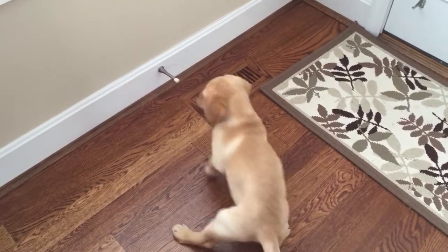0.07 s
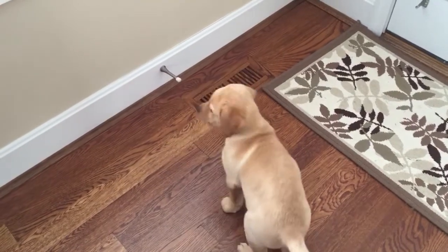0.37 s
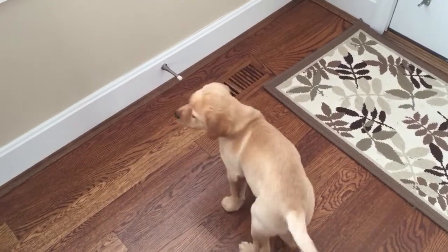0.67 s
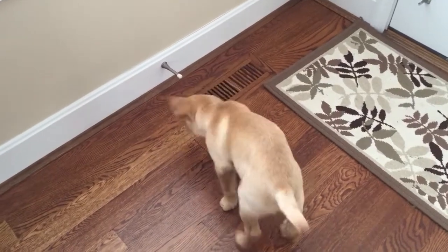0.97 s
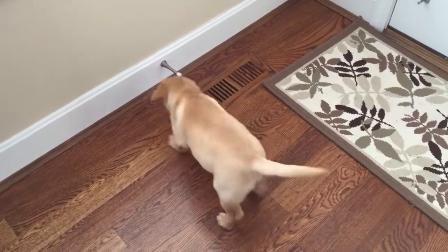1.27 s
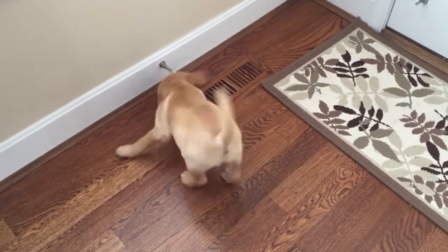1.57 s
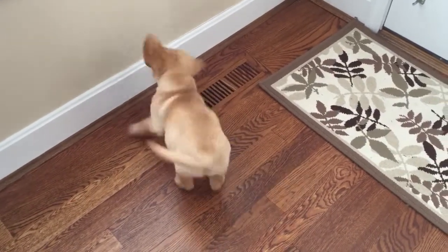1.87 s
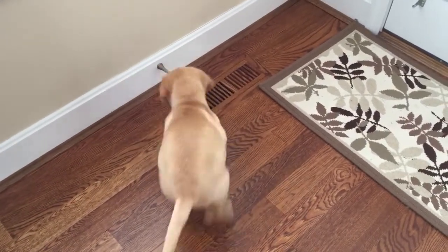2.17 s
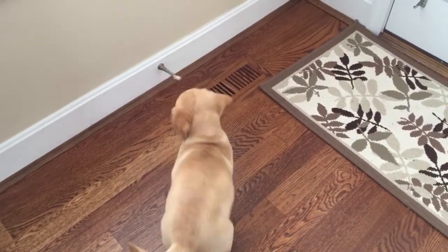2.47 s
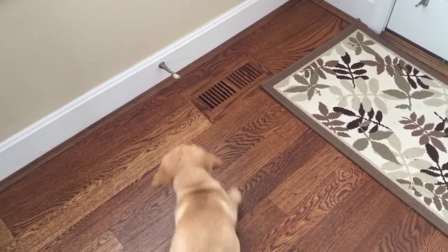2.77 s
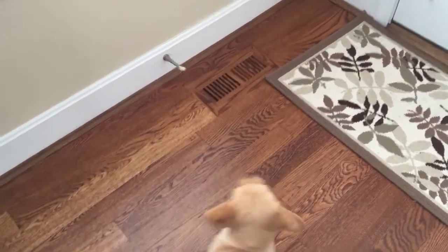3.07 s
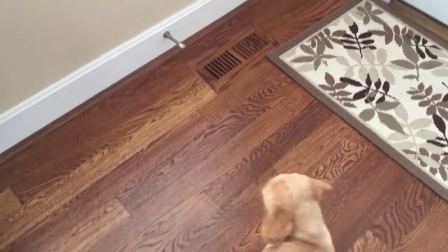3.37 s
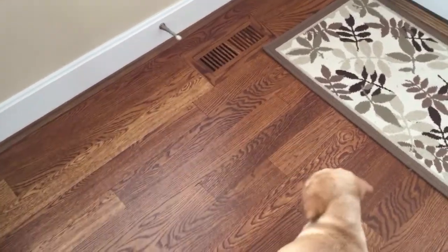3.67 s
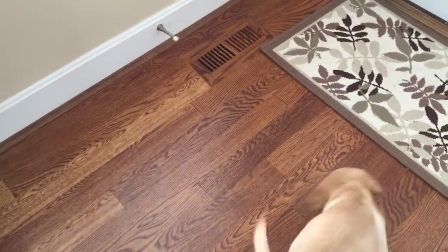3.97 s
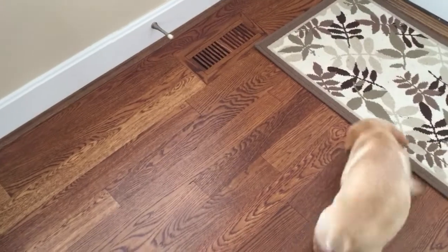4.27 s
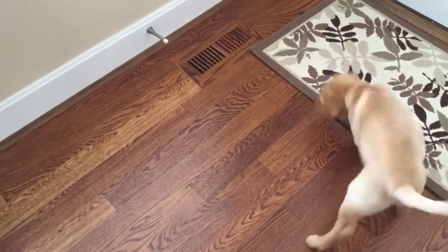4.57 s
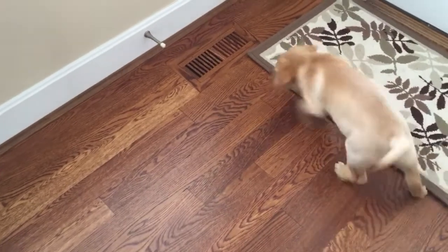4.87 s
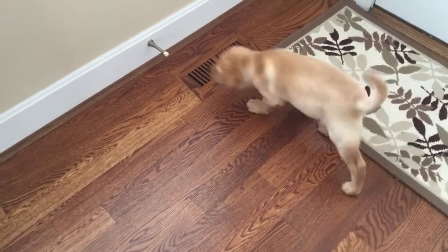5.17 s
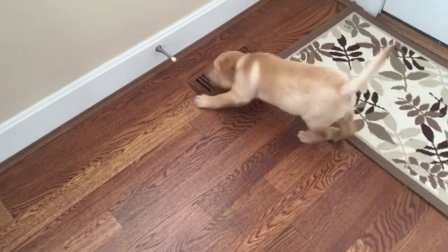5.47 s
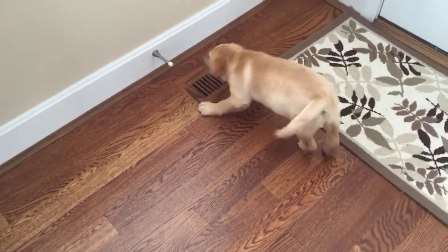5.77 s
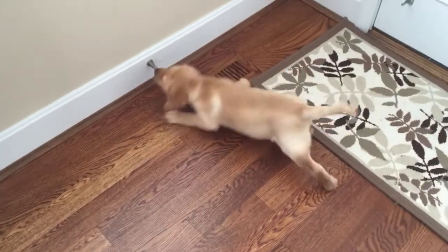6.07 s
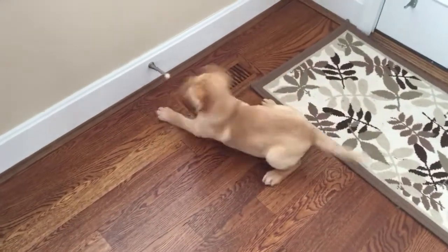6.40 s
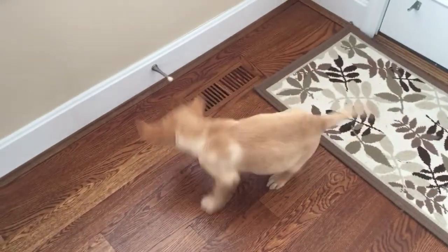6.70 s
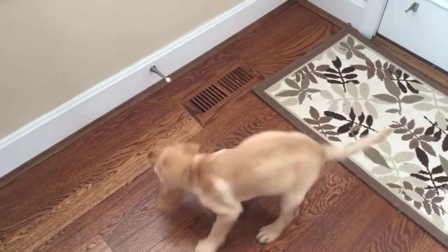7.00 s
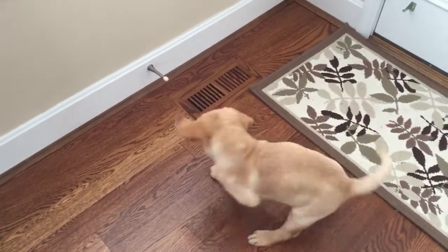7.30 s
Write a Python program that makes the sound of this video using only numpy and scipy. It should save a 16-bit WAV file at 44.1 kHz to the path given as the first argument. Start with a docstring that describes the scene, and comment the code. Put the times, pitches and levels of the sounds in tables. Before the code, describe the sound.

In an echoing hallway, six short, loud puppy barks crackle on a nearby phone microphone. After the first two, a spring door stop gives a long buzzing twang with clacking metal coils, dying away beyond the third bark. The next pair brings a weaker twang, and soft paws scramble on the wooden floor just before the final bark.

```python
"""In a hallway with a hardwood floor, the last buzz of a spring door stop dies away.
A puppy whimpers, barks twice and paws it: the spring swings ever faster as it dies, its coils
slapping together and the baseboard buzzing. A third bark cuts in; pads thump, slide and claws tick.
Two more barks and a smaller twang follow, then the puppy scrambles back and barks a sixth time.
Throughout, the hall rings; the barks overload a phone's microphone and its limiter holds them down."""
import sys
import numpy as np
from scipy import signal
from scipy.fft import rfft, irfft, next_fast_len
from scipy.io import wavfile
from scipy.ndimage import uniform_filter1d, minimum_filter1d, map_coordinates

SR = 44100
rng = np.random.default_rng(int(sys.argv[2]) if len(sys.argv) > 2 else 0)


def master_out(mix):
    """Clip the mix to full scale and print it as 16-bit PCM to the path in sys.argv[1]."""
    frames = np.transpose(np.atleast_2d(mix))
    ceiling = np.clip(frames, -1, 1)
    pcm = np.round(ceiling * 32767).astype(np.int16)
    wavfile.write(sys.argv[1], SR, pcm)


N = 323694
TIME = np.arange(N) / SR


def amp(db):
    """Decibels to gain."""
    return 10 ** (np.asarray(db) / 20)


def unit(x):
    """Scale to rms 1."""
    return x / np.sqrt(np.mean(x ** 2) + 1e-20)


def along(points, hz):
    """Read (f/Hz, value) points on a log frequency axis."""
    f, v = np.transpose(points)
    return np.interp(np.log(hz + 1), np.log(f + 1), v)


def curves(rows, t=TIME):
    """Automation lanes: each column after the time, read at times t."""
    s, *columns = np.transpose(rows)
    return [np.interp(t, s, column) for column in columns]


def wobble(rate, size=N):
    """A smooth random curve, rate knots a second."""
    knots = rng.standard_normal(int(size * rate / SR) + 4)
    return map_coordinates(knots, [np.arange(size) * rate / SR])


def body(spectrum, size=8192):
    """Minimum-phase impulse response with the given spectrum, peak 1."""
    magnitude = amp(along(spectrum, np.fft.rfftfreq(size, 1 / SR)))
    cepstrum = irfft(np.log(magnitude + 1e-6))
    cepstrum[1:size // 2] *= 2
    cepstrum[size // 2 + 1:] = 0
    response = irfft(np.exp(rfft(cepstrum)))
    return response / np.abs(response).max()


def ring(x, response):
    """Play x through an impulse response."""
    return signal.oaconvolve(x, response)[:N]


def noise(spectrum):
    """Coloured noise of rms 1."""
    return unit(ring(rng.standard_normal(N), body(spectrum)))


def strikes(times, gains, spectrum, t60, rise, size=4096):
    """Chattering contacts: each a fresh noise burst ringing a body and peaking at its gain."""
    out, t = np.zeros(N + 2 * size), np.arange(size) / SR
    response = body(spectrum)[:size]
    envelope = amp(-60 * t / t60) * (1 - np.exp(-t / rise))
    for s, gain in zip(times, gains):
        hit = signal.fftconvolve(rng.standard_normal(size) * envelope, response)
        out[max(0, int(s * SR)):][:len(hit)] += gain * hit / np.abs(hit).max()
    return out[:N]


# Colour of the quiet house: f/Hz, level/dB
ROOM_TONE_EQ = [(15, -48), (25, -20), (55, -11.5), (75, -13.5), (129, -15.5), (173, -8.5), (204, -12),
                (289, -12.5), (1170, -24), (15500, -44.5)]
def room_tone():
    """A faint, bass-heavy bed of noise."""
    return amp(-62) * noise(ROOM_TONE_EQ)


# Reverb time of the hallway: f/Hz, t60/s
HALL_DECAY = [(100, 1), (400, 0.54), (1000, 0.57), (2000, 0.58), (4000, 0.51), (12000, 0.41)]
def hall(x, wet_db):
    """Direct sound plus a pre-delayed tail whose treble dies first."""
    hz, t, spectra = signal.stft(rng.standard_normal(SR), SR, nperseg=256)
    decay = amp(-60 * t / along(HALL_DECAY, hz)[:, None])
    tail = signal.istft(spectra * decay, SR, nperseg=256)[1]
    tail = np.pad(tail, (SR // 300, 0))
    return x + amp(wet_db) * ring(x, tail / np.linalg.norm(tail))


# Early reflections off the floor and near walls: delay/s, level/dB
REFLECTIONS = [(.0032, -19), (.0086, -16), (0.0143, -13)]
def near_walls(x):
    """Sounds made at floor level come back from the nearest surfaces."""
    return x + sum(amp(db) * np.pad(x, (int(s * SR), 0))[:N] for s, db in REFLECTIONS)


# Claw cues: t/s, level/dB
CLAW_TICKS = [(5.447, -39.5), (5.456, -43), (5.482, -51), (6.5184, -44.5), (6.633, -39.5), (6.736, -46),
              (6.8, -41), (6.807, -43), (6.828, -47), (6.943, -49), (7.012, -44.5)]
# Footfall cues: t/s, level/dB
PAD_THUMPS = [(2.35, -30), (3.926, -35.5), (4.468, -30), (4.868, -39.5), (5.139, -37), (6.237, -21),
              (6.353, -33.5), (6.373, -22.5), (6.486, -28), (6.517, -21.5), (6.613, -29.5), (6.75, -35),
              (6.802, -26), (6.874, -25)]
# Fader ride of paws sliding on wood: t/s, level/dB
SLIDE_FADER = [(5.24, -66), (5.285, -46), (5.34, -52), (5.42, -55.5), (5.52, -56), (5.56, -64)]
def feet():
    """Claws tick, soft pads thump and paws slide on the boards."""
    s, db = np.transpose(CLAW_TICKS)
    claw_eq = [(300, -16), (2000, 11), (6000, 12), (10000, 2), (16000, -4)]
    claws = strikes(s, amp(db + 5), claw_eq, t60=.014, rise=.00073)
    s, db = np.transpose(PAD_THUMPS)
    pad_eq = [(25, -41), (75, -21), (140, 5.5), (400, -3), (800, -5.5), (2000, -9), (6000, -36)]
    pads = strikes(s - .004, amp(db - 4.5), pad_eq, t60=.097, rise=.0072)
    slide = noise([(60, -23), (250, 5), (1200, 1), (1850, 9), (3000, -11), (6000, -17), (15000, -38)])
    sliding = (TIME > SLIDE_FADER[0][0]) & (TIME < SLIDE_FADER[-1][0])
    slide *= amp(curves(SLIDE_FADER)[0] - 1.5 + 4.7 * wobble(55)) * sliding
    return hall(claws + pads + slide, wet_db=-4)


def swing_ages(first_s=.06208, shrink_s=.00043, shortest_s=.026):
    """Seconds from release to the start of each swing: the spring speeds up as it dies."""
    lengths = np.maximum(first_s - shrink_s * np.arange(100), shortest_s)
    return np.cumsum(lengths) - lengths


# Envelope of every twang: t/s after release, swing width/dB
TWANG_ENVELOPE = [(0, -5.5), (.3, -4.5), (.55, 1), (1.25, -3), (1.85, -1.5), (2.2, -11), (3.23, -14.5),
                  (3.36, -28.5), (3.75, -41.5), (3.9, -77.5)]
def swing_width(age):
    """Width of the swing in dB, age seconds after release."""
    return np.where(age < 0, -120, curves(TWANG_ENVELOPE, age)[0])


# The spring is let go, first before the scene opens: t/s, swing width/dB, slap trim/dB
RELEASES = [(-3.19, 0, -30), (1.6326, 0, 0), (6.0, -8.5, -14)]
def swing_phase():
    """Running count of swings through all the twangs."""
    starts = np.concatenate([s + swing_ages() for s, _, _ in RELEASES])
    starts = starts[starts >= 0]
    return np.interp(TIME, starts, np.arange(len(starts)))


# Where the coils meet: share of a swing, signed force
COIL_CONTACTS = [(0, 0.81), (.24, -0.14), (0.462, -0.14), (.75, 0.039)]
def contacts(phase, scatter_db, scatter_s):
    """One impulse whenever coils meet, four times a swing, loose in level and timing."""
    out = np.zeros(N)
    for share, force in COIL_CONTACTS:
        s = np.interp(np.arange(int(phase[-1])) + share, phase, TIME)
        timing, level = rng.standard_normal((len(s), 2)).T
        at = np.clip((s + scatter_s * timing) * SR, 0, N - 1).astype(int)
        out += np.bincount(at, force * amp(scatter_db * level), N)
    return out


# Low drum of the wall: f/Hz, level/dB
WALL_EQ = [(40, -25.5), (90, -6.5), (130, 2.5), (160, 4.5), (193, 15.5), (240, 8.5), (300, -18),
           (500, -51.5)]
# Woody buzz of the baseboard: f/Hz, level/dB
BOARD_EQ = [(160, -40), (270, -16.5), (305, -2.5), (345, -5.5), (378, -0.5), (415, 0.5), (455, -7),
            (520, -6.5), (600, -2.5), (660, 0.5), (715, -5.5), (785, -16), (900, -6.5), (1100, -14.5),
            (1430, -15), (2420, -120)]
# Midrange ring of the coils: f/Hz, level/dB
COIL_EQ = [(440, -30), (700, -15), (800, -23), (920, -6), (1150, -13), (1290, -3), (1490, 0), (1620, 0),
           (1800, -4), (2000, -3), (2170, -4), (2400, -11), (2750, -14), (3300, -22), (3820, -18),
           (4200, -27), (4600, -35), (7000, -50), (11000, -90)]
# Bright sizzle of the wire: f/Hz, level/dB
WIRE_EQ = [(2400, -17), (3300, -2.5), (3820, 2), (4300, -1.5), (4900, -6.5), (5820, -3.5), (6400, -6),
           (7010, -7), (8050, -9), (8600, -5), (9450, -6.5), (10400, -15.5), (11200, -12), (12500, -17),
           (14600, -12), (15500, -27)]
def spring_buzz():
    """Regular coil contacts drum the wall and baseboard, rattle the coils and make the wire sizzle."""
    width_db = np.max([db + swing_width(TIME - s) for s, db, _ in RELEASES], axis=0)
    phase = swing_phase()
    steady = contacts(phase, scatter_db=.7, scatter_s=.00008)
    wall = hall(ring(steady, body(WALL_EQ)), wet_db=-2)
    board = hall(ring(steady, body(BOARD_EQ)), wet_db=1.5)
    rattle = contacts(phase, scatter_db=3, scatter_s=.0003)
    coil = hall(near_walls(ring(rattle, body(COIL_EQ))), wet_db=4)
    ticks = contacts(phase, scatter_db=2.5, scatter_s=.00099)
    at = np.flatnonzero(ticks)
    wire = hall(strikes(at / SR, ticks[at], WIRE_EQ, t60=.011, rise=.00064), wet_db=4)
    # layer, level/dB at full width, dB lost per dB of width
    mix = [(wall, -41.5, 1.16), (board, -37, .66), (coil, -37, 1.09), (wire, -51, 1.1)]
    return sum(amp(db + slope * width_db) * unit(layer) for layer, db, slope in mix)


# Steel modes of the spring: f/Hz, relative level/dB, t60/s
STEEL_MODES = [(1490, -22, .075), (1620, -22, .075), (1995, -20, .085), (2850, -29, .07), (3820, -29, .07),
               (8680, -35, .04), (9400, -37, .04)]
def steel_ring(times, gains):
    """The coils' modes ring on after each clack, in a different balance each time."""
    out, t = np.zeros(N + SR), np.arange(SR // 5) / SR
    hz, db, t60 = np.transpose(STEEL_MODES)[:, :, None]
    modes = amp(db - 60 * t / t60) * np.sin(2 * np.pi * hz * t) * (1 - np.exp(-t / .001))
    for s, gain in zip(times, gains):
        balance = amp(3 * rng.standard_normal(len(hz)))
        out[int(s * SR):][:len(t)] += gain * balance @ modes
    return out[:N]


def clacks(cues):
    """Hard contacts at floor level: a clack, a bright tick, a thud of wood and ringing steel."""
    s, db, treble_db = np.transpose(cues)
    clack = strikes(s, amp(db - 1.5), COIL_EQ, t60=.016, rise=.0012)
    tick = strikes(s - .001, amp(db + treble_db + 7), WIRE_EQ, t60=.013, rise=.0044)
    thud = strikes(s, amp(db - 14), BOARD_EQ, t60=.0067, rise=.0016)
    return hall(near_walls(clack + tick + thud) + steel_ring(s, amp(db)), wet_db=-4)


# One-shot clack cues: t/s, level/dB, treble trim/dB
ACCENT_CUES = [(2.023, -21.5, -32), (2.316, -12, -31), (2.484, -16, -23), (2.54, -13.5, -28),
               (2.65, -17.5, -30), (2.843, -17.5, -30.5), (3.841, -22.5, -29.5), (3.871, -30, -38.5),
               (6.252, -11, -27.5), (6.356, -17.5, -29), (6.377, -22.5, -33), (6.4978, -20.5, -38),
               (6.651, -13.5, -42), (6.7235, -25.5, -34), (6.825, -39, -29)]
def accent_clacks():
    """Extra hard clacks that accent strokes of the long twang, and knocks as the puppy scrambles back."""
    return clacks(ACCENT_CUES)


# Slap rhythms after release: from t/s, until t/s, level/dB, treble trim/dB, stroke accents/dB
SLAP_FIGURES = [ (.22, 1.04, -14, -27, (-2, 0.5, -5, -9.5, -13, -2.5)),
                (1.04, 1.225, -13, -27, (-8, -3.5, 1, -18.5, -8, 2)), (1.27, 1.4, -11.5, -27.5, (-1, 0)),
                (1.4, 1.92, -28, -17.5, (-12, 0)), (1.92, 2.37, -15.5, -27.5, (-0.5, -24, -28, -0.5)),
                (2.37, 2.848, -16, -21.5, (2, -26, -25, -15)),
                (2.86, 3.6, -19, -49, (-8.5, -24, -5.5, -23))]
def spring_slaps(far_side=.405):
    """Coils clack on either side of a swing; the tip whirls, so the accents repeat in figures."""
    starts = swing_ages()
    far_hits = starts[:-1] + far_side * np.diff(starts)
    strokes = np.column_stack([starts[:-1], far_hits]).ravel()
    cues = []
    for s, width_db, slap_db in RELEASES:
        for since, until, db, treble_db, accents in SLAP_FIGURES:
            for k, age in enumerate(strokes):
                if since <= age < until and 0 < s + age < TIME[-1]:
                    level_db = db + width_db + slap_db + swing_width(age) + accents[k % len(accents)]
                    cues.append((s + age, level_db, treble_db))
    return clacks(cues)


# Thin whistles of the throat: t/s, length/s, first f/Hz, last f/Hz, level/dB
WHISTLE_CUES = [(0.929, 0.059, 1744, 1643, -57), (.985, .08, 1510, 1386, -53),
                (5.56, 0.023, 5220, 6380, -32.5), (7.037, .022, 5790, 3940, -37)]
def whistle(s, length, first_hz, last_hz, db):
    """A thin unsteady glide: a faint whimper, or the squeak that leads into a bark."""
    progress = np.clip((TIME - s) / length, 0, 1)
    hz = (first_hz + (last_hz - first_hz) * progress) * (1 + .06 * wobble(900))
    tone = np.sin(2 * np.pi * np.cumsum(hz) / SR)
    swell = 2 * np.sqrt(progress * (1 - progress))
    return hall(amp(db) * swell * tone, wet_db=-3)


# Bright crackle of the microphone overloading on loud barks: f/Hz, level/dB
CRACKLE_EQ = [(2500, -28), (4000, 5.5), (5400, -5), (7500, -6.5), (9000, 0), (10600, -9), (12500, -7),
              (15500, -23.5)]
def mic_crackle(gain):
    """Microphone overload, played as flickering hiss on top of the barks."""
    flicker = amp(3.2 * wobble(420))
    return hall(gain * unit(noise(CRACKLE_EQ) * flicker), wet_db=-11)


# Room modes for each bark, from where the puppy stands: f/Hz, t60/s, peak level/dB
ROOM_MODES = [
    [(992, 0.53, -18), (1800, 1, -32)],
    [(883, 1, -30), (1950, .8, -26)],
    [(610, .5, -25.5)],
    [(945, 1.6, -21)],
    [(990, 1.05, -23), (2720, 0.82, -27)],
    [(670, .5, -37)],
]
def room_ring(voices):
    """Each bark sets narrow room resonances ringing."""
    out, t = np.zeros(N + 2 * SR), TIME[:SR]
    for voice, modes in zip(voices, ROOM_MODES):
        start, end = np.flatnonzero(voice)[[0, -1]]
        for hz, t60, db in modes:
            mode = amp(-60 * t / t60) * np.cos(2 * np.pi * hz * t)
            tone = signal.fftconvolve(voice[start:end], mode)
            out[start:][:len(tone)] += amp(db) * tone / np.abs(tone).max()
    return out[:N]


def vocal_folds(t, pitch, rough):
    """Overtones that flutter and break up when forced, and air let through once a cycle."""
    flutter = (.004 + .075 * rough) * wobble(450, len(t))
    phase = 2 * np.pi * np.cumsum(pitch * (1 + flutter)) / SR
    lags = rng.uniform(0, 2 * np.pi, (24, 1))  # the throat delays each overtone differently
    folds = unit(np.cos(np.outer(np.arange(1, 25), phase) + lags).sum(0))
    # uneven closures add a growl an octave down
    folds *= 1 + rough * (1.1 * wobble(300, len(t)) + 1.6 * np.cos(phase / 2))
    air = unit(rng.standard_normal(len(t)) * (1 + np.cos(phase)) * amp(4 * wobble(250, len(t))))
    return folds + 1.1 * rough * air


def formant(hz, centre, width):
    """A resonance of height 1 with steep skirts."""
    return (1 + ((hz - centre) / width) ** 2) ** -1.2


# Colour of the throat: f/Hz, level/dB
THROAT_EQ = [(40, -29), (250, -6), (480, -9.5), (640, 2.5), (1050, -1.5), (1440, 1), (1700, 0.5),
             (2300, 3.5), (2650, 8), (3250, 3), (3600, -1.5), (4300, -0.5), (6000, -11), (16000, -23)]
def bark(shape, faders, attack=.00503, release=.0037, fade=.029):
    """The folds sound through three formants that glide with the mouth; gives voice and crackle gain."""
    start, end = int((shape[0][0] - attack / 2) * SR), int((shape[-1][0] + release / 2) * SR)
    t = TIME[start:end]
    pitch, rough, *_ = curves(shape, t)
    jaw_db, tongue_db, muzzle_db, crackle_db = curves(faders, t)
    folds = vocal_folds(t, pitch, np.clip(rough, .05, .8))
    hz, frames, spectra = signal.stft(folds, SR, nperseg=512, noverlap=448)
    _, rough, jaw_hz, tongue_hz, muzzle_hz = curves(shape, t[0] + frames)
    hz = hz[:, None]
    spectra *= amp(along(THROAT_EQ, hz))
    widen = 1 + 2.1 * rough  # a rough voice widens all three formants
    chest = amp(-20) * formant(hz, 300, 200)
    mouth = [(formant(hz, jaw_hz, 69.4 * widen) + chest, jaw_db),
             (formant(hz, tongue_hz, 129 * widen), tongue_db - .36),
             (formant(hz, muzzle_hz, 177 * widen), muzzle_db)]
    voice = np.zeros(len(t))
    for peak, db in mouth:
        band = signal.istft(spectra * peak, SR, nperseg=512, noverlap=448)[1][:len(t)]
        running_rms = np.sqrt(np.abs(uniform_filter1d(band ** 2, size=500)) + 1e-12)
        voice += amp(db) * band / running_rms
    gate = np.clip((t - t[0]) / attack, 0, 1) * np.clip((t[-1] - t) / release, 0, 1)
    gate *= amp(-4 * np.clip(1 - (t[-1] - t) / fade, 0, 1))  # the voice gives out at the end
    return np.pad(gate * np.array([voice, amp(crackle_db)]), ((0, 0), (start, N - end)))


# Glides of each bark: t/s, pitch f/Hz, roughness 0-1, jaw f/Hz, tongue f/Hz, muzzle f/Hz
BARK_SHAPES = [
    [(1.183, 326, 0.3, 945, 2100, 2930), (1.218, 423.5, 0.16, 1000, 1760, 3160),
     (1.234, 488.5, 0.5, 1020, 1710, 3300), (1.28, 502.5, 0.36, 1000, 1810, 3240),
     (1.325, 490.5, 0.45, 1070, 1880, 3170), (1.36, 301.7, 0.1, 1060, 2000, 3110)],
    [(1.563, 453.4, 0.38, 1370, 1800, 3250), (1.583, 554, 0.47, 1074, 2030, 3410),
     (1.605, 520.6, .51, 1000, 1980, 3330), (1.635, 436, 0.56, 860, 1920, 2850),
     (1.68, 383.4, 0.4, 780, 1880, 2750)],
    [(2.94, 507.6, 0.38, 1040, 2130, 3250), (2.956, 466.7, 0.5, 1050, 2140, 3250),
     (2.976, 398.5, 0.65, 825, 1890, 3130), (2.992, 326.4, 0.2, 600, 1660, 3100),
     (3.022, 291.5, 0.37, 604, 1570, 2950), (3.055, 261, 0.18, 524, 1590, 2910)],
    [(5.528, 200.3, 0.3, 1240, 1630, 3340), (5.575, 292.3, 0.51, 1183, 1580, 3430),
     (5.625, 415.4, .45, 782, 1940, 3230), (5.675, 471.5, 0.5, 940, 1830, 3330),
     (5.715, 323, 0.63, 990, 1740, 3200)],
    [(5.963, 369.3, 0.47, 870, 1670, 3230), (5.986, 546, 0.8, 1080, 1720, 3460),
     (6.022, 554.2, 0.52, 960, 1790, 3250), (6.048, 486, .75, 914, 1900, 2960),
     (6.08, 376.4, 0.8, 918, 1757, 2700)],
    [(7.04, 295.6, 0.53, 1440, 1660, 4400), (7.07, 438, 0.5, 1270, 1830, 3550),
     (7.092, 596, 0.4, 1150, 2080, 3270), (7.112, 453.1, 0.48, 890, 1700, 3100),
     (7.127, 378.6, 0.45, 735, 1720, 2940), (7.145, 332, 0.4, 680, 1700, 2980)],
]
# Fader rides of each bark: t/s, jaw level/dB, tongue level/dB, muzzle level/dB, crackle level/dB
BARK_FADERS = [
    [(1.183, -34.5, -40, -52.5, -62.5), (1.195, -24, -32.5, -39.5, -58.5), (1.22, -22.5, -22.5, -28, -49.5),
     (1.24, -12, -20, -22.5, -46.5), (1.273, -15, -18.5, -16, -40.5), (1.291, -10.5, -12, -30.5, -44),
     (1.319, -9.5, -20, -22, -35.5), (1.332, -18, -20.5, -39, -40), (1.36, -14, -20, -44.5, -40)],
    [(1.563, -19, -35, -37, -57), (1.571, -18, -23, -31, -43), (1.591, -2, -18, -21, -53),
     (1.607, -17, -16, -18, -42.5), (1.619, -13, -13, -31.5, -39), (1.653, -15, -20, -25.5, -42.5),
     (1.68, -13.5, -28, -50, -40.5)],
    [(2.94, -27.5, -34, -44, -46.5), (2.958, -18.5, -21.5, -29, -46), (2.972, -22.5, -17, -20.5, -44),
     (2.982, -28, -19.5, -33.5, -51), (2.996, -35, -13, -44, -40.5), (3.02, -22, -26.5, -52, -51),
     (3.055, -27, -14.5, -51, -43)],
    [(5.528, -30, -42, -52, -58.5), (5.568, -21.5, -31, -57, -47), (5.574, -17, -34, -36, -49),
     (5.598, -19, -15, -26, -41.5), (5.644, -11.5, -16, -35, -41), (5.674, -21, -8, -24, -32.5),
     (5.715, -8.5, -23.5, -30, -38)],
    [(5.963, -25, -31, -32, -51), (5.983, -15, -18.5, -29, -38.5), (6.003, -11, -10.5, -16, -28.5),
     (6.025, -22, -5.5, -33.5, -30), (6.045, -11, -20, -18.5, -35), (6.069, -23.5, -23, -44, -40),
     (6.08, -15, -9, -32, -41)],
    [(7.04, -32, -28, -59, -45.5), (7.054, -17, -34.5, -27, -50.5), (7.07, -9.5, -15.5, -21.5, -40),
     (7.08, -18.5, -17.5, -20, -37.5), (7.096, -11.5, -16.5, -19, -27.5), (7.113, -15.5, -6, -22.5, -26.5),
     (7.128, -17.5, -5.5, -42.5, -33), (7.145, -16, -15.5, -44, -33.5)],
]
def puppy():
    """Barks in the hall; the hardest moments add a low puff and microphone crackle."""
    barks = np.array([bark(shape, faders) for shape, faders in zip(BARK_SHAPES, BARK_FADERS)])
    voice, crackle_gain = barks.sum(0)
    force = np.abs(uniform_filter1d(voice ** 2, size=600)) ** 1.1
    puff = amp(-19.5) * force * noise([(15, -15.5), (60, -6.5), (150, -10), (400, -9.5), (1000, -33)])
    return puff + mic_crackle(crackle_gain) + hall(near_walls(voice), wet_db=-8) + room_ring(barks[:, 0])


def scene():
    """Puppy and spring over the quiet of the house, in mono."""
    dog = puppy() + sum(whistle(*cue) for cue in WHISTLE_CUES) + feet()
    door_stop = accent_clacks() + spring_buzz() + spring_slaps()
    return (dog + door_stop + room_tone())[None]


def record(dry):
    """A fast limiter, soft overload that puts an edge on the hardest peaks, then the phone's high cut."""
    threshold, ceiling, knee, top_hz = 1.1, .76, 4.5, 15400
    needed = np.minimum(1, threshold / (np.abs(dry) + 1e-9))
    limited = dry * uniform_filter1d(minimum_filter1d(needed, size=80), size=50)
    clipped = limited / (1 + np.abs(limited / ceiling) ** knee) ** (1 / knee)
    size = next_fast_len(N + SR // 2)
    passband = np.fft.rfftfreq(size, 1 / SR) < top_hz
    return irfft(rfft(clipped, size) * passband, size)[..., :N]


dry = scene()
out = record(dry)
master_out(out)
```